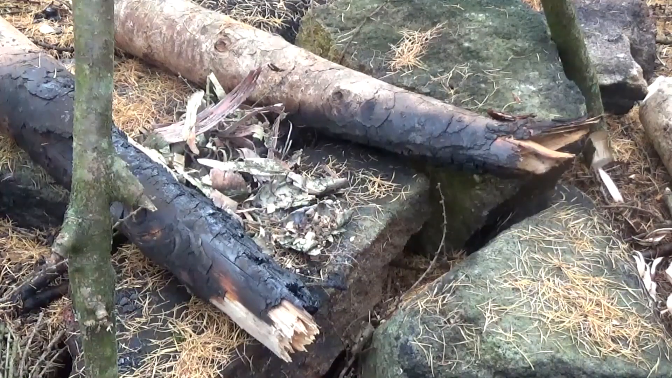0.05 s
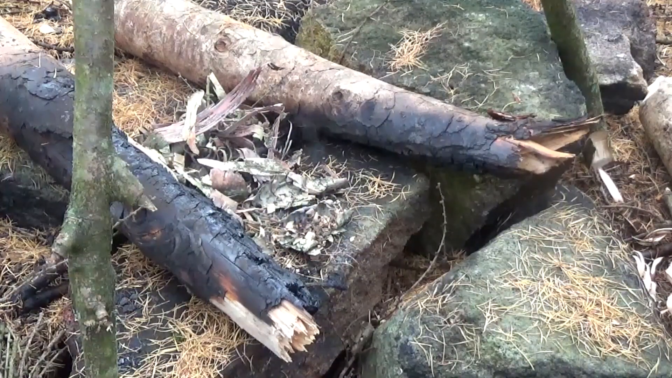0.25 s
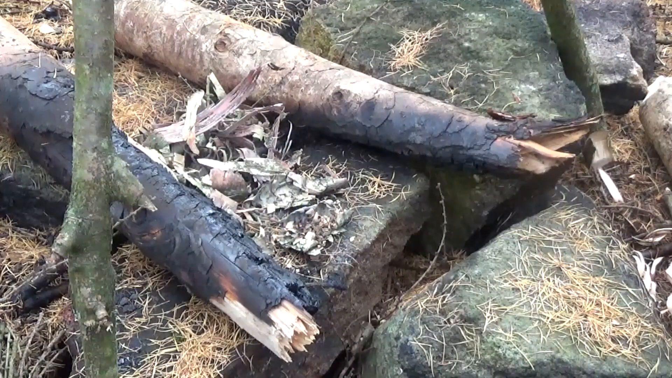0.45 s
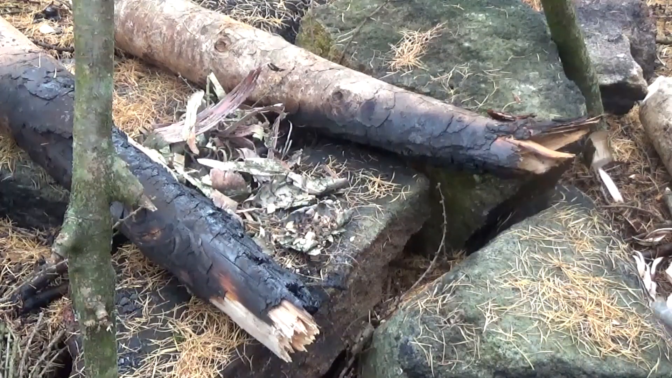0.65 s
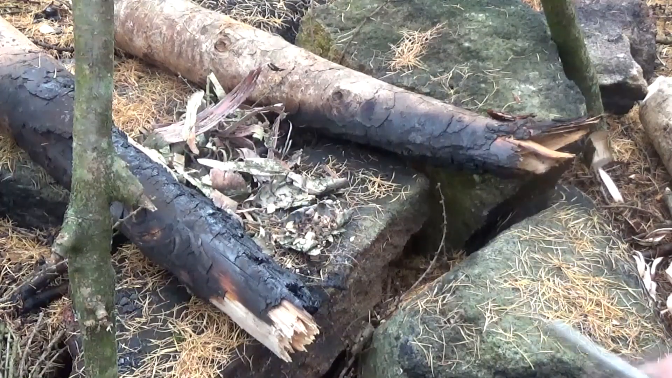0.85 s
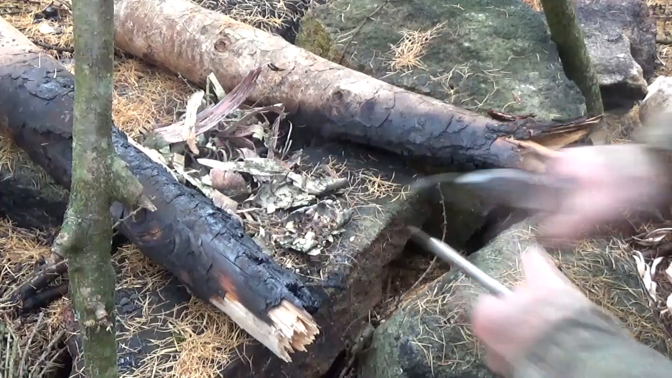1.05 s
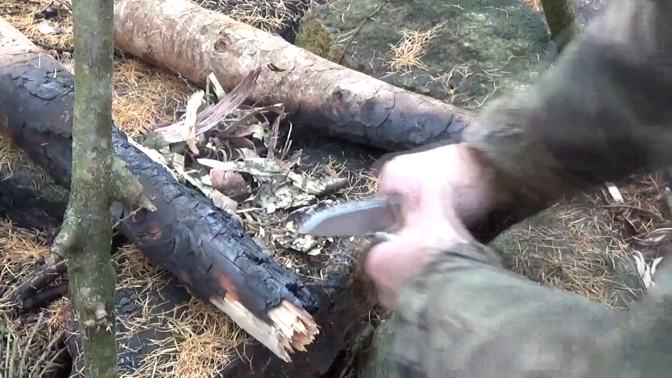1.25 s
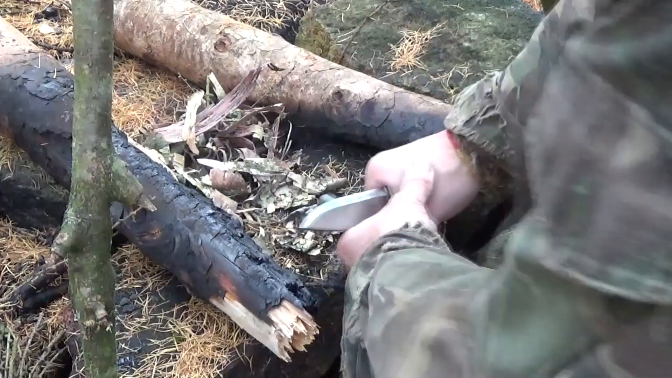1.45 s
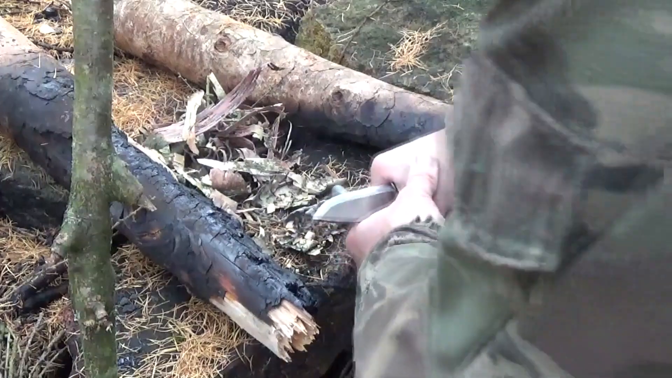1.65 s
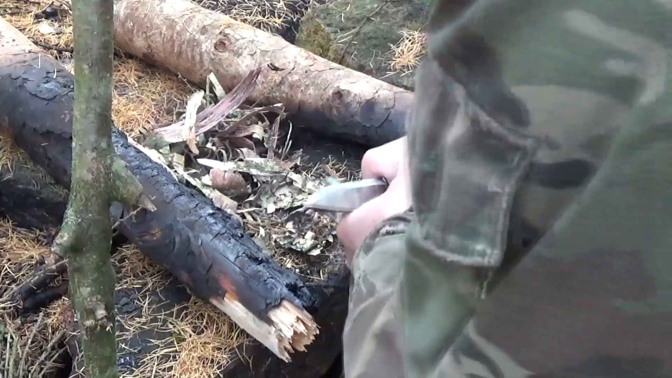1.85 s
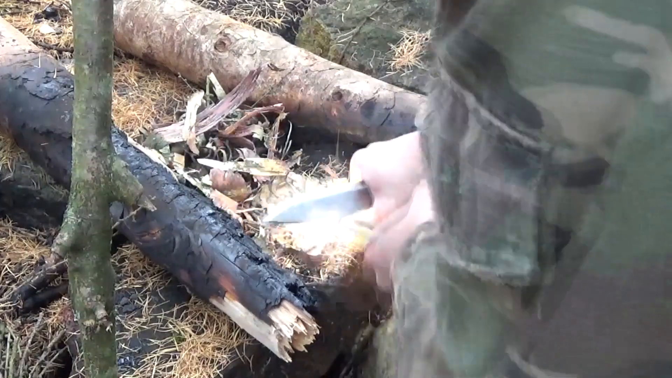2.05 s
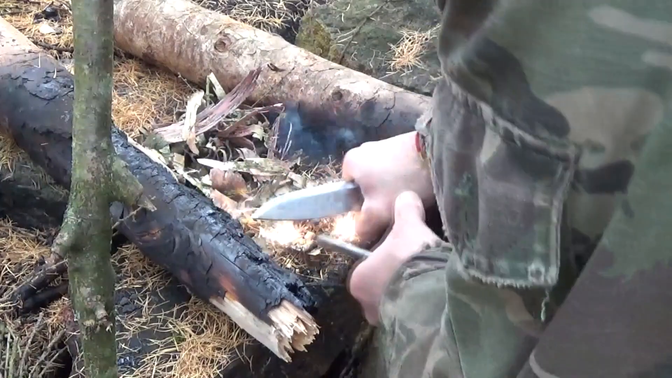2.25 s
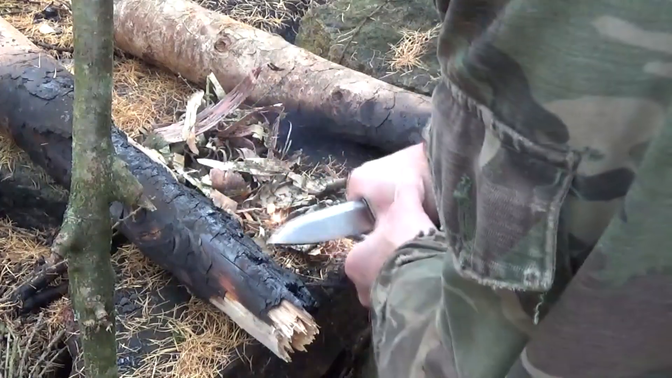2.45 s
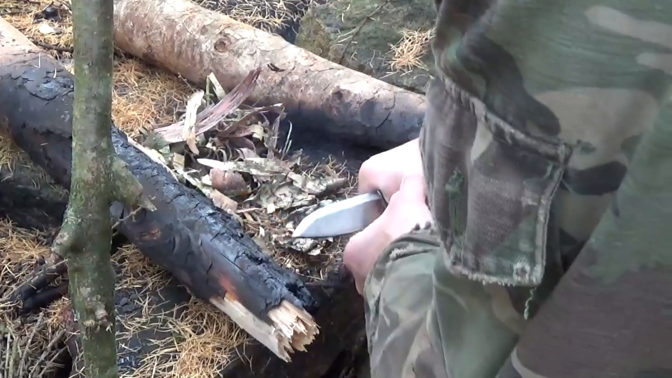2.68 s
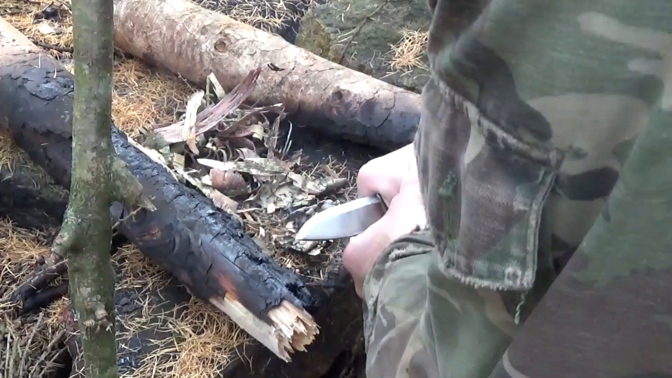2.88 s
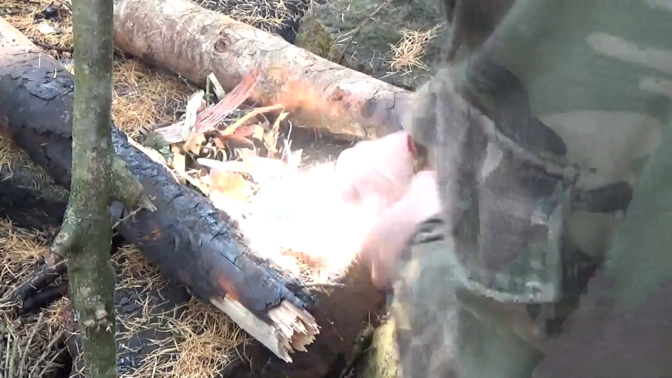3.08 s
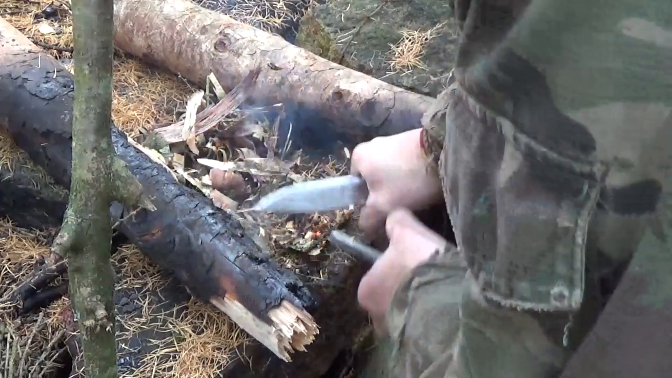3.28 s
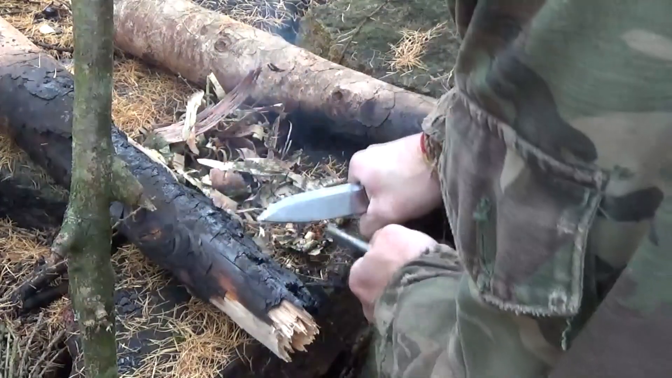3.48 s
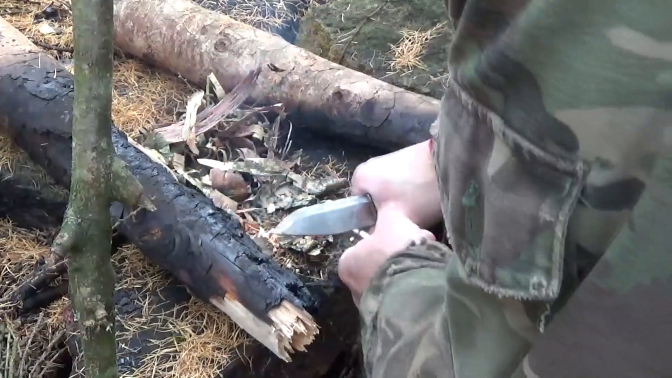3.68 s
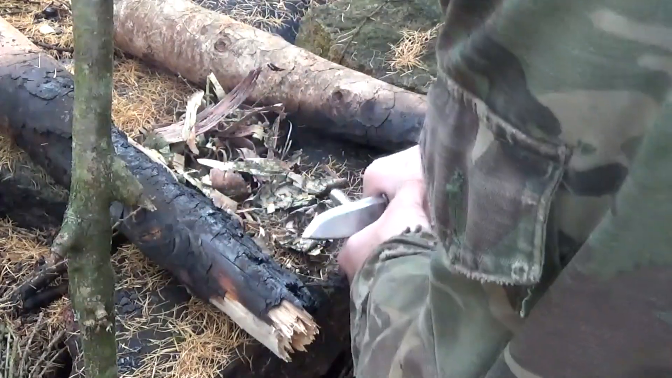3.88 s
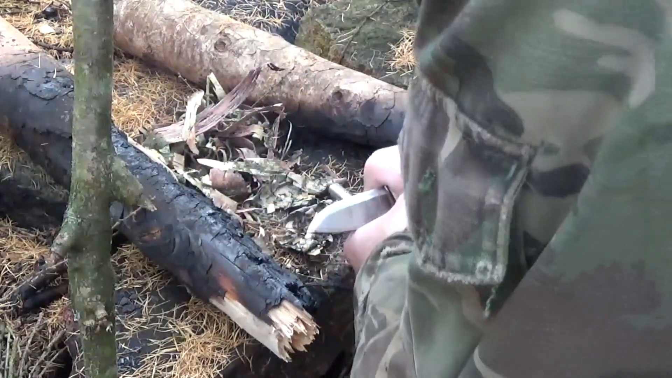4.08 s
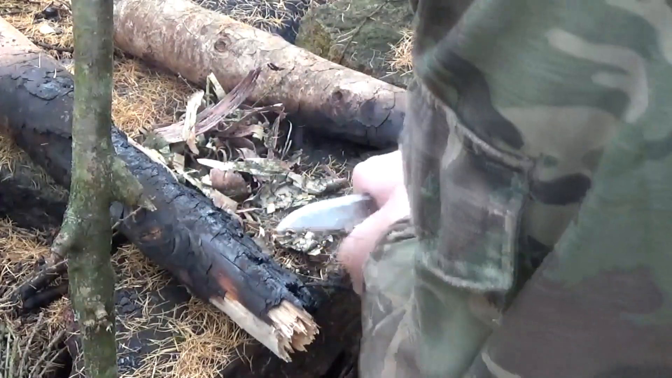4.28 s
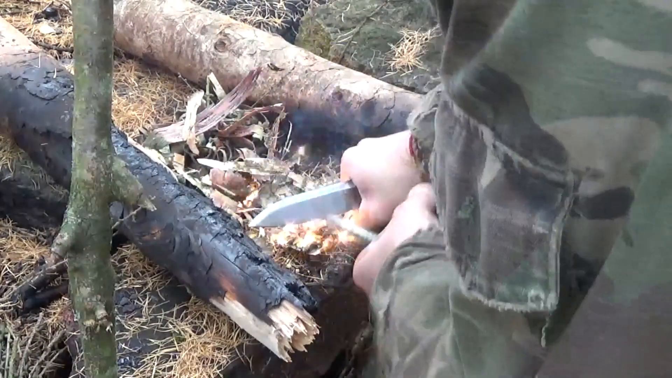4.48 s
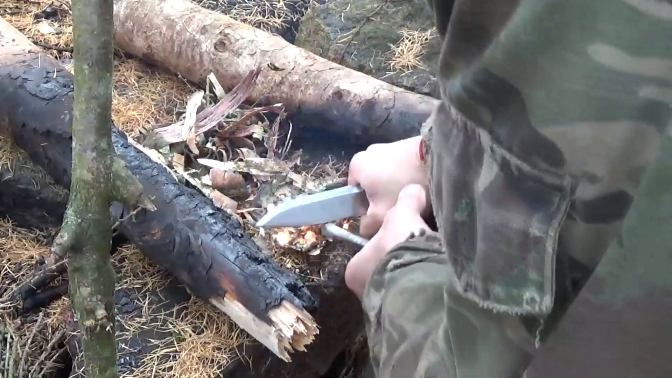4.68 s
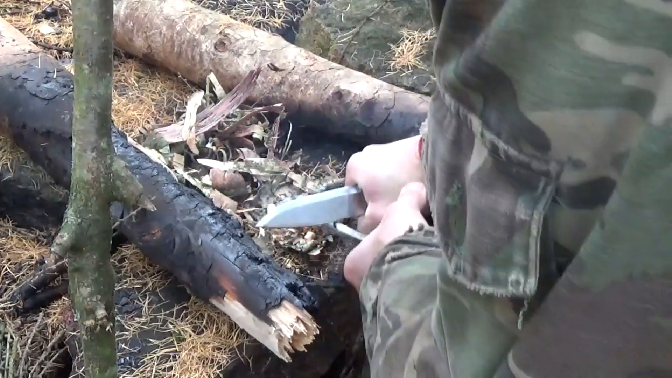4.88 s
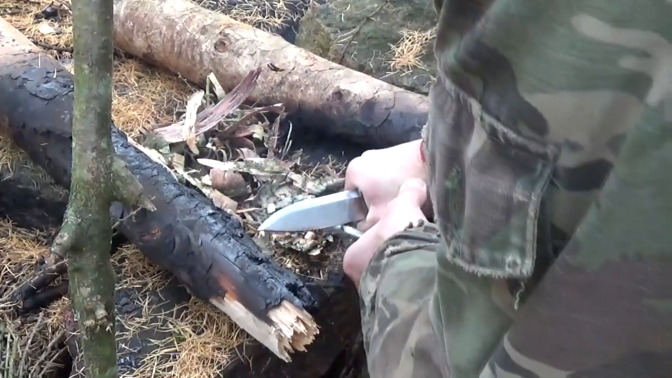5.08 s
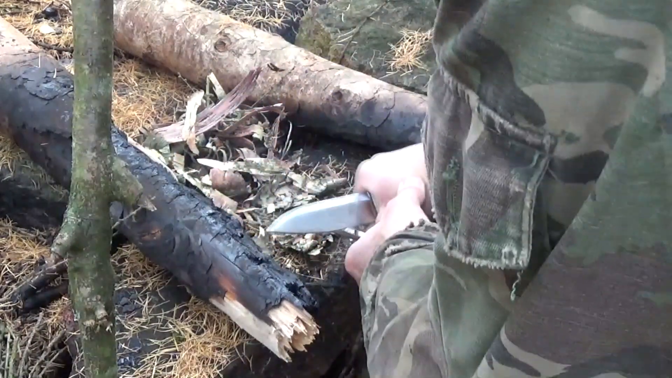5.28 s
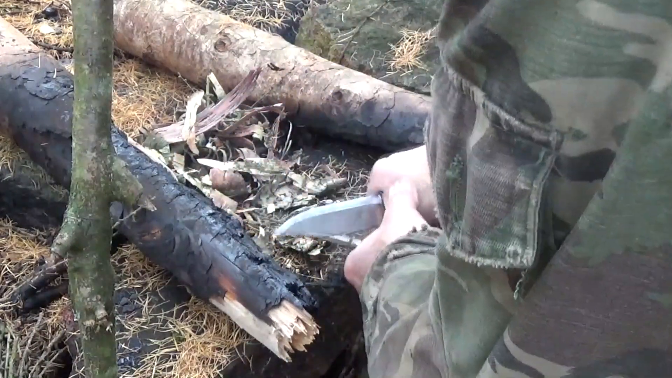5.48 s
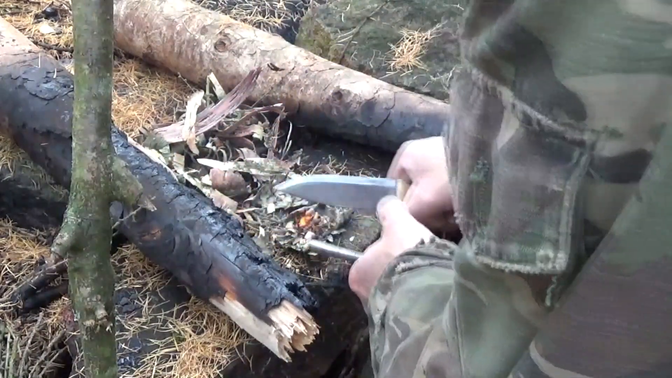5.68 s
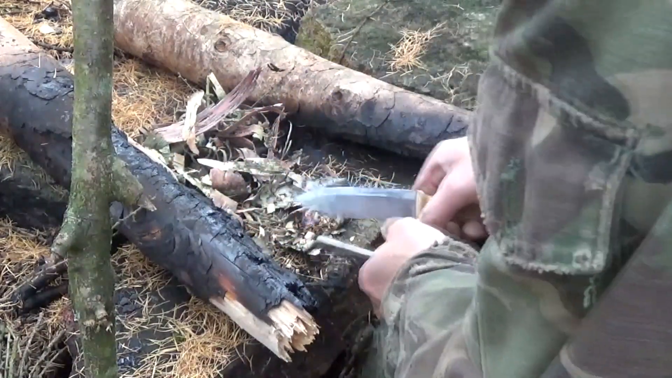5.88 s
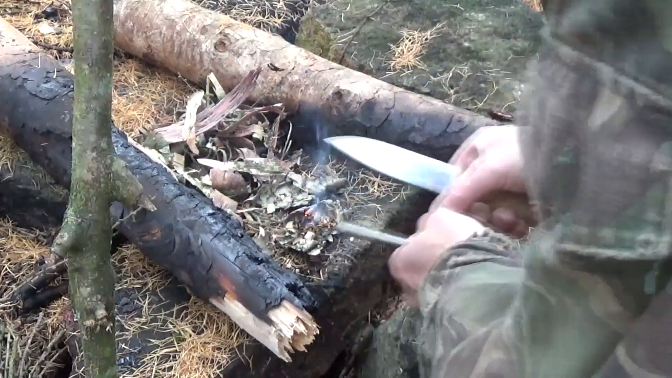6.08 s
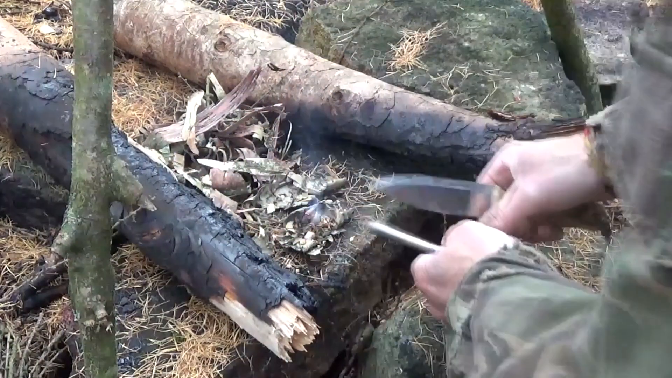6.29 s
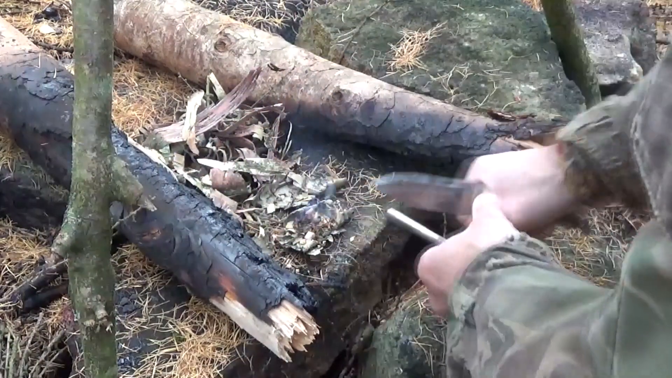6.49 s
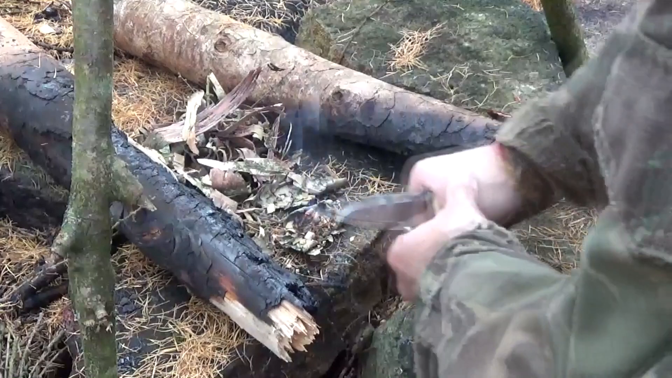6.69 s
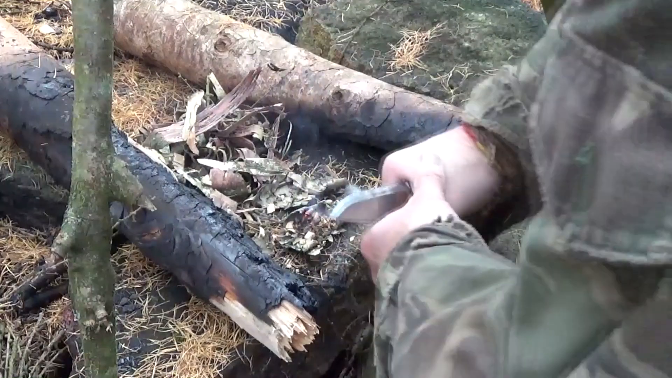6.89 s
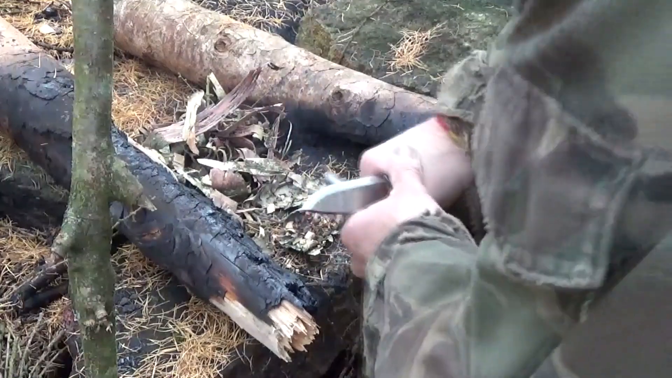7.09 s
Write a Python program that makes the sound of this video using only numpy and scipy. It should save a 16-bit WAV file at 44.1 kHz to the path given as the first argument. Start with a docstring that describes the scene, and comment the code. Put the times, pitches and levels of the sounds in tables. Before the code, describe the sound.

Close, dry metal scrapes and ringing steel taps as a blade strikes a fire rod, over faint outdoor air and camera ticking.

```python
"""A knife spine scrapes down a ferro rod in three strokes and a light draw back, close by in a quiet wood.
The blade sings as narrow friction notes, grinds as hails of micro-impacts, snags in bursts of that grit,
and taps the rod as ringing steel modes; the hand bumps the handle, a low damped hum; surroundings scatter it all.
A sleeve and far road are shaped noise, a far engine a wavering tone; a camera ticks each frame and whines."""
import sys
import numpy as np
from scipy import signal
from scipy.fft import rfft, irfft, next_fast_len
from scipy.io import wavfile
from scipy.ndimage import uniform_filter1d, map_coordinates

SR = 44100
rng = np.random.default_rng(int(sys.argv[2]) if len(sys.argv) > 2 else 0)


def pcm_store(signal):
    """Save signal as 16-bit PCM."""
    levels = np.round(np.clip(np.atleast_2d(signal), -1, 1) * 32767)
    wavfile.write(sys.argv[1], SR, levels.astype(np.int16).T)


N = 314874


def amp(db):
    """Decibels to gain."""
    return 10 ** (np.asarray(db) / 20)


def unit(x):
    """Scaled to rms 1."""
    return x / np.sqrt(np.mean(x ** 2) + 1e-20)


def along(points, hz):
    """(f/Hz, value) points interpolated on a log frequency axis."""
    f, value = np.transpose(points)
    return np.interp(np.log(hz + 1), np.log(f + 1), value)


def curves(rows):
    """One value per sample for each column after the time t/s."""
    s, *columns = np.transpose(rows)
    return [np.interp(np.arange(N) / SR, s, column) for column in columns]


def wobble(rate_hz):
    """A smooth random curve, rate_hz knots a second."""
    knots = rng.standard_normal(int(N * rate_hz / SR) + 4)
    return map_coordinates(knots, [np.arange(N) * rate_hz / SR])


def filtered(x, response):
    """x through a complex response of frequency."""
    m = next_fast_len(N + SR // 2)
    return irfft(rfft(x, m) * response(np.fft.rfftfreq(m, 1 / SR)), m)[..., :N]


def scraping():
    """Light pressure lets the blade sing; more bite turns the slide into broad grinding, which snags swell."""
    song_db, high_hz, high_db, high_hard_db = -4, 5240, -23, 17.5  # high note grows in a hard slide
    thud_db, thud_exponent = -13.5, 1.2  # below 1 kHz, at full bite
    sparkle_db, duller_db = -9, 12  # above 6 kHz at full bite; loss at no bite
    slide_grinds, bite_sings = 0.053, 0.16  # power shares: grinding at no bite, song at full bite
    level_db, bite, main_hz, low_hz, low_db = contacts()
    bite = np.clip(bite, 0, 1)
    hard = np.clip((level_db + 52) / 12, 0, 1)  # a hard slide widens the main note
    main = np.sqrt(1 - hard) * note(main_hz, width_hz=250) + np.sqrt(hard) * note(main_hz, width_hz=540)
    low = amp(low_db) * note(low_hz, width_hz=200)
    high = amp(high_db + high_hard_db * hard) * note(np.full(N, high_hz), width_hz=480)
    grinds = np.sqrt(np.abs(slide_grinds + (1 - slide_grinds) * bite))
    sings = np.sqrt(np.abs(1 - (1 - bite_sings) * bite))
    thud = amp(thud_db) * bite ** thud_exponent
    sparkle = amp(sparkle_db - duller_db * (1 - bite))
    slide = amp(level_db) * np.array([thud, grinds, sparkle])
    rough = grit(count=24000, spread_db=2.8, life_s=.0018, hiss_db=-2, clump_db=1.6)
    grinding = np.sum((slide + snags()) * rough, axis=0)
    song = amp(level_db + song_db + 0.83 * wobble(120)) * sings * (main + low + high)
    return grinding + song


def contacts():
    """Level, bite and notes of edge on rod; where contacts overlap their powers add and the louder one leads."""
    # strokes along the rod: [t/s, level/dB, bite/0-1, main note f/Hz, low note f/Hz, low note re main/dB]
    strokes = [
        [(1.95, -51.5, 0.15, 3700, 1430, -12), (1.978, -37, 0.18, 3720, 1440, -18),
         (2.025, -30.5, 0.02, 3620, 1410, -9.5), (2.036, -34, 0.25, 3610, 1400, 2.5),
         (2.08, -35.5, 0.82, 3800, 1480, -18), (2.112, -36, 1, 3600, 1690, -3),
         (2.118, -31.5, 0.4, 3655, 1700, -8), (2.157, -32, 0.91, 3560, 1690, 0),
         (2.196, -43, 1, 3700, 1640, -2)],
        [(3.04, -47, 0.7, 3700, 1490, -16), (3.06, -29, 0, 3670, 1490, -15), (3.086, -30, .7, 3460, 1480, -1.5),
         (3.1, -31, 0.9, 3600, 1660, 1), (3.125, -30, 0.9, 3830, 1670, -8), (3.157, -30.5, 0.98, 3950, 1710, 3),
         (3.168, -40.5, 1, 3090, 1680, -1), (3.228, -40, 1, 3070, 1630, 7.5), (3.24, -49.5, .9, 3100, 1630, 3),
         (3.27, -57, 1, 3150, 1630, -1)],
        [(3.72, -46.5, .9, 3490, 1453, 5), (3.735, -45, 1, 3484, 1420, 0), (3.8, -50, 0.57, 3700, 1417, 1.5),
         (3.865, -56, 0.32, 3540, 1400, 3.5), (3.9, -65, .3, 3450, 1390, 3)],
        [(4.282, -63, .2, 3620, 1530, -3.5), (4.304, -32, .2, 3570, 1540, -18),
         (4.325, -32.5, 0.2, 3450, 1560, -9), (4.36, -33, .3, 3500, 1640, -11),
         (4.378, -34, .8, 3530, 1660, -12), (4.425, -31.5, 1, 3560, 1700, -4), (4.455, -37, 1, 3450, 1750, 1.5),
         (4.487, -35, 0.85, 3540, 1770, 4), (4.555, -50.5, 0.9, 3500, 1700, -5)],
    ]
    # short rubs, blade skids, settles or is set back: [start t/s, length/s, first level/dB, last level/dB, bite/0-1]
    rub_rows = [(1.323, 0.1, -57, -53.5, 0.08), (1.423, 0.034, -54, -52.5, 0.26),
                (2.214, 0.0061, -27, -38, 0.65), (2.231, 0.05, -45.5, -50, 0.8),
                (2.279, 0.037, -37.5, -49.5, 1), (2.324, 0.118, -40.5, -54.5, 0.8),
                (2.455, 0.01, -41, -44, 0.67), (2.477, 0.059, -36.5, -56.5, 1),
                (2.565, 0.083, -43.5, -70.5, 1), (2.662, 0.042, -56, -56.5, 0.04),
                (3.292, 0.035, -47.5, -58, 1), (3.323, .006, -52, -58, 1), (3.34, 0.021, -61, -61, 1),
                (3.547, .02, -55, -65, .7), (3.608, .03, -65, -58, 0.9), (3.648, 0.036, -48, -57, .6),
                (3.699, 0.0094, -44, -45, 1), (4.568, 0.064, -53.5, -51.5, .9),
                (4.654, 0.036, -45, -48, 0.8), (4.716, 0.013, -53, -58, 0.8), (4.752, .02, -56, -60, .5),
                (5.565, 0.014, -41.5, -63, 0.9), (6.635, 0.027, -58, -65, .3), (6.675, .065, -58, -62, .6),
                (6.769, 0.073, -52, -58, 0.1)]
    # notes in a rub: [main f/Hz, low f/Hz, low re main/dB]
    rub_notes = (3600, 1450, -8)
    rise_s, fall_s, edge_db = 0.0084, .012, 17  # each contact swells in and dies out by edge_db
    rubs = []
    for s, length_s, first_db, last_db, bite in rub_rows:
        rubs.append([(s, first_db, bite, *rub_notes), (s + length_s, last_db, bite, *rub_notes)])
    t = np.arange(N) / SR
    power = 1e-14
    lead = power * np.array([0, *rub_notes])[:, None]
    for rows in strokes + rubs:
        first, last = rows[0], rows[-1]
        before = (first[0] - rise_s, first[1] - edge_db, *first[2:])
        after = (last[0] + fall_s, last[1] - edge_db, *last[2:])
        db, *controls = curves([before, *rows, after])
        touch = amp(2 * db) * (t > before[0]) * (t < after[0])
        power = power + touch
        lead = lead + touch * np.array(controls)
    return 10 * np.log10(power), *(lead / power)


def note(hz, width_hz):
    """A resonance driven by friction: narrow noise around a moving centre."""
    drive = filtered(rng.standard_normal((2, N)), lambda f: 1 / (1 + (2 * f / width_hz) ** 2))
    phase = 2 * np.pi * np.cumsum(hz) / SR
    return unit(drive[0] * np.cos(phase) + drive[1] * np.sin(phase))


def grit(count, spread_db, life_s, hiss_db, clump_db):
    """The rough rod under the edge: unequal micro-impacts, each ringing the steel at a chance pitch, over hiss."""
    # colour of the biting blade: [f/Hz, relative density/dB per Hz]
    grind_colour = [(88, -47), (150, -29.5), (310, -14.5), (400, -16.5), (677, -6), (812, -8), (1300, -8.5),
                    (1710, 2.5), (2050, -1), (3410, 4.5), (9950, -16.5), (10900, -19.5), (11500, -29),
                    (15000, -63), (22000, -120)]
    when, pitch, size, life = rng.random((count, 4)).T[:, :, None]
    t = np.arange(SR // 200) / SR
    sizes = amp(np.minimum(-spread_db * np.log(size), 4 * spread_db))
    decay_s = life_s * (0.069 + life ** 2)  # crowded toward the short end
    rings = sizes * np.sin(2 * np.pi * 11500 * pitch * t) * np.exp(-t / decay_s)
    places = (when * N).astype(int) + np.arange(len(t))
    hail = np.bincount(places.ravel(), rings.ravel())[:N]
    clumps = amp(clump_db * (wobble(480) + 0.46 * wobble(90)))
    rough = clumps * (unit(hail) + amp(hiss_db) * rng.standard_normal(N))
    return thirds(filtered(rough, lambda f: amp(along(grind_colour, f))))


def thirds(x):
    """Thud, body and sparkle of a sound, split at 1 and 6 kHz, each of rms 1."""
    low = lambda f: 1 / (1 + (f / 1000) ** 6)
    high = lambda f: 1 - 1 / (1 + (f / 6000) ** 8)
    body = lambda f: 1 - low(f) - high(f)
    return [unit(filtered(x, band)) for band in (low, body, high)]


def snags():
    """The edge tears off shavings: gains of thud, body and sparkle rise quickly and fall more slowly."""
    # snags: [t/s, level/dB, thud re level/dB, sparkle re level/dB]
    snag_rows = [(2.0378, -45, -2, -21), (2.071, -42, -28, -3), (2.0906, -33.5, -19, 1),
                 (2.114, -34, -32, 1), (2.3238, -38.5, -17, -3), (2.345, -43, -13, -11),
                 (3.089, -36, -12, -24), (3.107, -51, -22, -16), (3.122, -42, -8, -16),
                 (3.177, -45, -22, -1), (3.201, -42, -16, -10), (3.223, -49, -28, -17),
                 (3.2355, -46, -10, 3.5), (3.3, -41, -14, -17), (4.302, -45, -34, -5),
                 (4.376, -46, -17, -14), (4.403, -49, -25, -22), (4.427, -28, -19, -11),
                 (4.472, -36, -13, -21), (4.483, -31.5, -19, -32), (4.5132, -34.5, -15, -29),
                 (4.6044, -42, -27, -9), (4.6645, -36, -28, -11), (4.6845, -42, -46, -17)]
    rise_s = 0.0019
    u = np.arange(SR // 10) / SR / rise_s
    burst = u * np.exp(1 - u)
    gains = np.zeros((3, N + SR))
    for s, db, thud_db, sparkle_db in snag_rows:
        bands_db = db + np.array([[thud_db], [0], [sparkle_db]])
        gains[:, round(s * SR):][:, :len(u)] += amp(bands_db) * burst
    return gains[:, :N]


def taps():
    """Each tap rings the steel at new strengths; grip and contact point shift the modes and favour one region."""
    # taps of blade on rod: [t/s, level/dB, low modes/dB, high modes/dB, most favoured f/Hz]
    tap_rows = [(1.2499, -23, -5.5, -49, 3620), (1.2823, -35.5, -3.5, -45, 3520),
                (1.7861, -45.5, -5, -11, 3430), (2.148, -18, 4, -14, 3460), (2.267, -15, -5.5, -8.5, 3200),
                (2.2832, -23, -17, -14, 3330), (2.3714, -24, -4, -2, 3220), (2.452, -23, 4, -21, 3700),
                (2.4752, -16, -3.5, -5, 3750), (2.5597, -17.5, -5, -7, 3230), (3.0851, -13.5, 3, -24, 3360),
                (3.155, -17.5, -19, -23, 4100), (3.4109, -43.5, -9.5, -8, 3460),
                (3.4454, -38.5, -5, -31, 2260), (3.4632, -25, -32, -5.5, 4550), (3.5183, -35, -1, -7, 4400),
                (3.5834, -31.5, 11, -23, 1330), (3.6448, -22.5, 3.5, -38, 1350),
                (3.6998, -23.5, 9, -9, 1895), (3.7028, -23.5, -6.5, -18, 3200),
                (4.2557, -43, -4, -18, 2334), (4.7, -13.5, -5.5, -18, 6000), (4.7068, -28, -13, -24, 3170),
                (4.7853, -43, 5.5, -6.5, 3470), (4.9006, -27.5, -3, -28, 4400),
                (4.9175, -40.5, 9.5, -26, 3600), (5.5584, -30.5, -14, -11, 4110),
                (5.5655, -22, -18, -12, 3420), (6.6084, -13.5, -6, -26.5, 5300), (6.62, -27, 4, -36, 3640),
                (6.6259, -33.5, 6, -32, 3600), (6.889, -35, -8, -8, 5900)]
    # modes of gripped blade and rod: [f/Hz, level/dB, t60 before grip/s]
    steel = [(1120, -10.5, 0.082), (1363, 1, 0.037), (1780, -5, 0.026), (2244, -3.5, 0.039),
             (2824, 4, 0.018), (3270, 5, 0.0059), (3596, -2.5, 0.03), (4150, 8, 0.0085), (5010, 1.5, 0.024),
             (6230, 3, 0.03), (7620, 3.5, 0.014), (8700, 1, 0.057), (9300, -18, 0.0048),
             (10500, -32, 0.027)]
    pan_mean_db, pan_scatter_db, grip = -0.3, 0.1, 0.93  # left re right; the hand shortens rings by grip
    t = np.arange(SR // 10) / SR
    out = np.zeros((2, N + SR))
    hz, mode_db, t60_s = np.transpose(steel)[:, :, None]
    # three partials a mode: frequency ratios, levels in dB
    near, near_db = np.array([[1.66, 0.99, 1.32], [-5.0, 1, 0.33]])[:, :, None, None]
    chances = rng.standard_normal((len(tap_rows), 4, 3, len(steel), 1))
    for (s, db, low_db, high_db, best_hz), chance in zip(tap_rows, chances):
        tilt = [(1400, low_db), (2200, 0), (4200, 0), (5500, 0.57 * high_db + 5.5), (7500, high_db)]
        favour_db = 7 * np.exp(-(np.log(hz * near / best_hz) / .09) ** 2)
        colour_db = along(tilt, hz * near) + favour_db
        fade = amp(mode_db + near_db + colour_db + 0.53 * chance[0] - 60 * t / (t60_s * grip))
        polarity = np.sign(chance[2] + .8)
        rings = polarity * fade * np.sin(2 * np.pi * hz * near * (1 + 0.0098 * chance[1]) * t)
        contact_s = .000076 * amp(-.45 * high_db)  # a softer, longer contact gives a duller tap
        blow = (1 - np.exp(-t / contact_s)) ** 2 * (1 + 2.25 * np.exp(-t / 0.0018))  # louder at contact
        tap = rings.sum(axis=(0, 1)) * blow
        pan_db = pan_mean_db + pan_scatter_db * chance[3, 0, 0]
        gain = amp(db + pan_db * np.array([[.5], [-.5]]))
        out[:, round(s * SR):][:, :len(t)] += gain * tap / np.abs(tap).max()
    return filtered(out[:, :N], lambda f: (1j * f / (500 + 1j * f)) ** 2)  # the taps carry little bass


def bumps():
    """The hand bumps the handle: a soft push sets off one low, damped ring."""
    # bumps: [t/s, level/dB, f/Hz, t60/s]
    bump_rows = [(3.578, -51, 252, .15), (3.638, -40.5, 733, 0.11), (3.665, -49, 566, .08),
                 (3.697, -51, 341, 0.073)]
    rise_s = 0.0035
    t = np.arange(SR // 4) / SR
    out = np.zeros(N + SR)
    for s, db, hz, t60_s in bump_rows:
        push = 1 - np.exp(-t / rise_s)
        out[round(s * SR):][:len(t)] += amp(db - 60 * t / t60_s) * push * np.sin(2 * np.pi * hz * t)
    return out[:N]


def nearby(x):
    """Stones, logs and the body scatter the sound for some tens of ms, differently to each port."""
    # what they return: [f/Hz, level/dB]
    scatter = [(200, -15), (700, -16), (1500, -18.5), (3000, -18), (6000, -9), (11000, -9)]
    t = np.arange(SR // 8) / SR
    tail = rng.standard_normal((2, len(t))) * amp(-60 * t / 0.055)
    tail = tail / np.linalg.norm(tail[0])
    late = np.pad(x, (30, 0))[None]
    echo = signal.fftconvolve(late, tail, axes=1)[:, :N]
    return filtered(echo, lambda f: amp(along(scatter, f)))


def woodland():
    """Far road and air as noise, a far engine's swelling hum, and the sleeve brushing as the arms reach in."""
    # sleeve: [t/s, level/dB]; its cloth: [f/Hz, relative density/dB per Hz]
    sleeve_level, cloth = [(.55, -87), (.8, -62.5), (1.06, -60), (1.31, -60.5), (1.61, -68.5), (1.95, -84)], [(500, -30), (900, 0), (1800, -1), (3500, -3.5), (6000, -10),
                                           (11000, -26)]
    # far road and air: [t/s, level/dB]; colour: [f/Hz, relative density/dB per Hz]
    wood_level, air_colour = [(0.0, -61), (1.0, -59), (2.0, -59.5), (2.22, -57), (2.9, -60.5), (3.7, -57),
                              (4.22, -59.5), (4.51, -58), (5.0, -60), (7.14, -61)], [(12, -30), (25, -20), (60, -11.5), (100, -12), (160, -9.5),
                                            (350, -5), (600, 0), (900, 0), (1300, -7), (2000, -11),
                                            (2800, -9), (4000, -15), (7500, -18), (11500, -21)]
    # engine swells: [centre t/s, added level/dB, 1/e half-width/s]
    drone_swells = [(.45, -82, .3), (1.17, -76, 0.044), (2.4, -83, 0.43), (3.168, -75, 0.098),
                    (3.86, -70, 0.16), (4.447, -75, .1), (5.403, -80, 0.15), (6.17, -79, 0.097),
                    (6.85, -77, 0.24)]
    drone_hz, faint_db = 111, -84
    t = np.arange(N) / SR
    swells = amp(faint_db)
    for s, db, half_s in drone_swells:
        swells = swells + amp(db) * np.exp(-((t - s) / half_s) ** 2)
    phase = 2 * np.pi * np.cumsum(drone_hz + 3 * wobble(7.2)) / SR
    drone = swells * amp(0.81 * wobble(8.2)) * np.sin(phase)
    sleeve = amp(curves(sleeve_level)[0] + 0.81 * wobble(30.8)) * rush(cloth, patchy_db=1.5)
    air = amp(curves(wood_level)[0]) * rush(air_colour, patchy_db=.5)
    return air + drone + sleeve


def rush(spectrum, patchy_db):
    """Stereo noise of rms 1 with patches of random gain; mid and side shares set the likeness of the ports."""
    # left-right likeness: [f/Hz, correlation]
    alike = [(60, 0.89), (170, 0.92), (490, 0.88), (1420, 0.5), (4080, 0.62), (11700, 0.69)]
    z = signal.stft(rng.standard_normal((2, N)), nperseg=512)[2]
    field = uniform_filter1d(uniform_filter1d(rng.standard_normal(z.shape[1:]), 6, 0), 14, 1)
    pair = signal.istft(z * amp(patchy_db * unit(field)), nperseg=512)[1][:, :N]
    turn = lambda hz: np.arccos(np.clip(along(alike, hz), -1, 1)) / 2
    shares = lambda hz: amp(along(spectrum, hz)) * [np.cos(turn(hz)), np.sin(turn(hz))]
    mid, side = filtered(pair, shares)
    return unit(np.array([mid + side, mid - side]))


def camera():
    """A double pip each frame, polarity alternating, a little later in the right port; a thin throbbing whine."""
    # pips of a tick: [f/Hz, level/dB, start re frame t/s, length/s]
    tick_pips = [(3480, -51.5, -.0012, 0.012), (2750, -57, -.002, 0.006)]
    # electronics: [f/Hz, level/dB]
    whine_tones = [(7800, -77)]
    frames_per_s, first_tick_s, scatter_db = 25, .0235, 1
    t = np.arange(N) / SR - first_tick_s - np.array([[0], [.0005]])
    frame = np.floor(t * frames_per_s + .25).astype(int)
    chance = rng.standard_normal((frame.max() + 2, 2))[frame]
    pips = 0
    for hz, db, start_s, length_s in tick_pips:
        since = t - frame / frames_per_s - start_s
        rise = np.clip(since / (0.3 * length_s), 0, 1)
        fall = np.clip((length_s - since) / (0.65 * length_s), 0, 1)
        gain = (-1.) ** frame * amp(db + scatter_db * chance[..., 0])
        pips = pips + gain * rise * fall * np.sin(2 * np.pi * hz * since + 0.26 * chance[..., 1])
    throb = 1 + 0.33 * np.sin(2 * np.pi * 2 * frames_per_s * t[0])
    whine = 0
    for hz, db in whine_tones:
        whine = whine + amp(db + 1.5 * wobble(20)) * np.sin(2 * np.pi * hz * t[0] + 0.38 * wobble(16))
    return pips + throb * whine


def scene():
    """The knife near the middle, scrapes and taps a little to the right, in its surroundings."""
    knife = scraping() * amp([[-.2], [.2]]) + taps() + bumps()
    return knife + nearby(knife.mean(axis=0)) + woodland() + camera()


def record(dry):
    """The input stage rounds off the highest peaks, drops the deepest bass and limits the band."""
    top_hz = 11100
    rounded = dry / (1 + np.abs(dry / .3) ** 4) ** (1 / 4)
    bass_cut = lambda hz: (1j * hz / (60 + 1j * hz)) ** 2
    residue = lambda hz: amp(-36) * (hz < 12330)  # a faint remnant above top_hz
    band = lambda hz: np.maximum(1 / (1 + (hz / top_hz) ** 200), residue(hz))
    return filtered(rounded, lambda hz: bass_cut(hz) * band(hz))


dry = scene()
out = record(dry)
pcm_store(out)
```